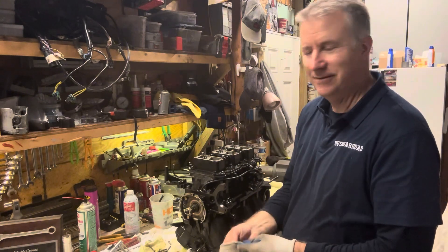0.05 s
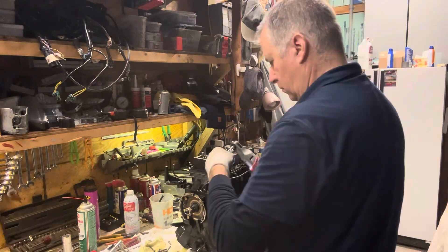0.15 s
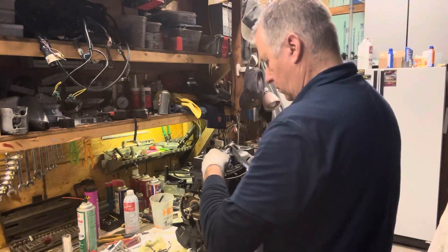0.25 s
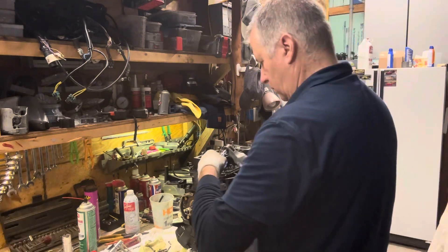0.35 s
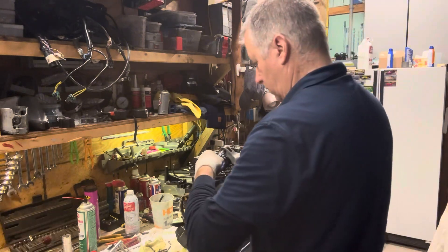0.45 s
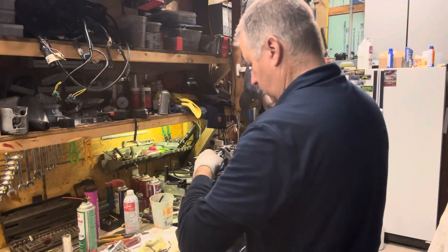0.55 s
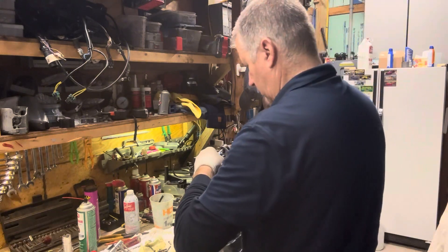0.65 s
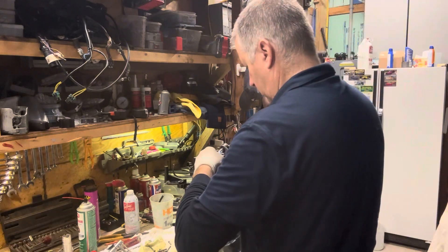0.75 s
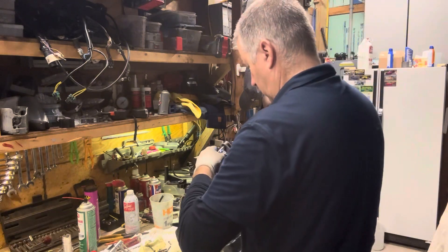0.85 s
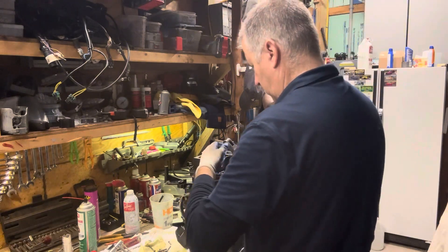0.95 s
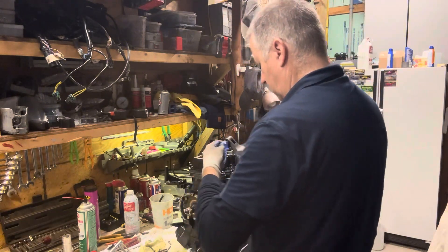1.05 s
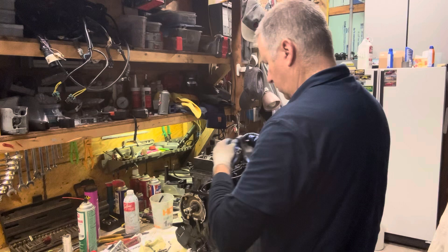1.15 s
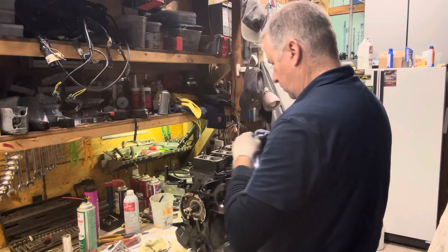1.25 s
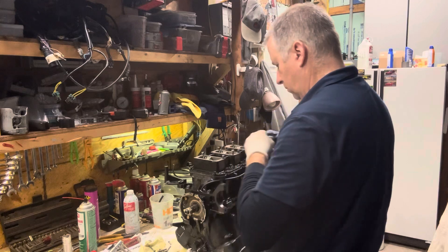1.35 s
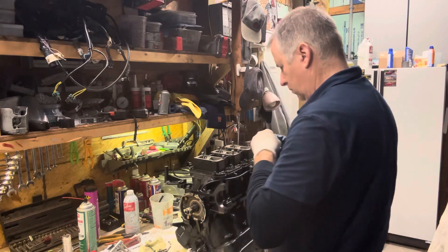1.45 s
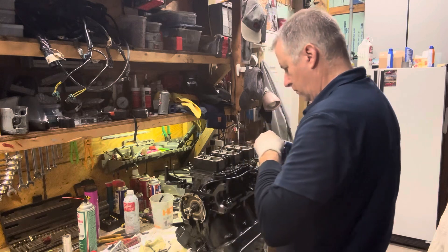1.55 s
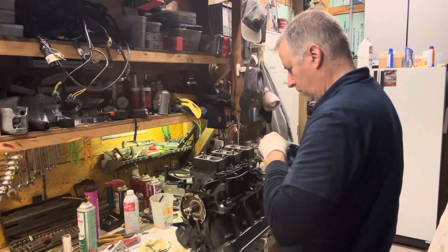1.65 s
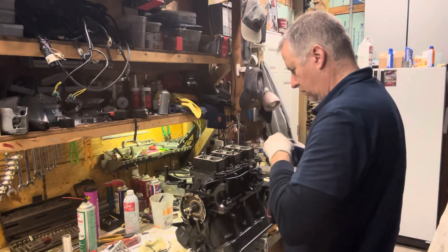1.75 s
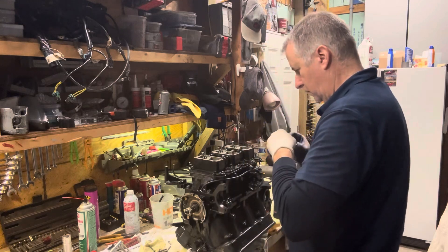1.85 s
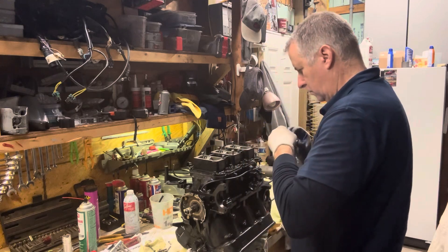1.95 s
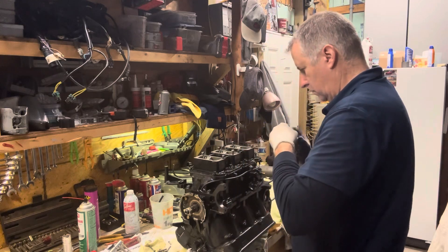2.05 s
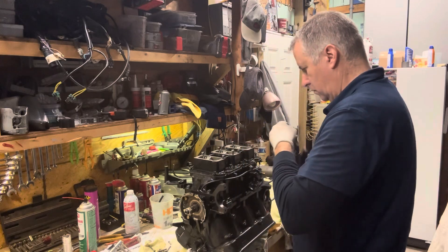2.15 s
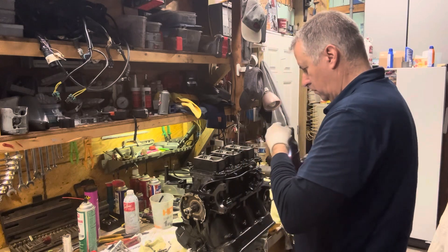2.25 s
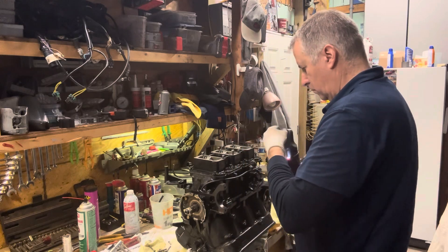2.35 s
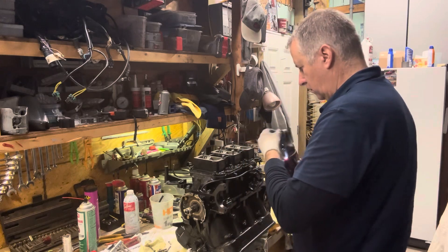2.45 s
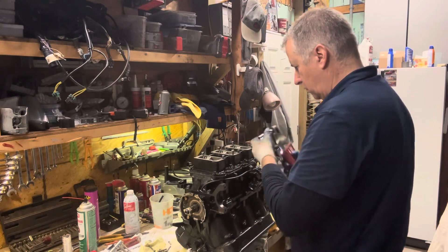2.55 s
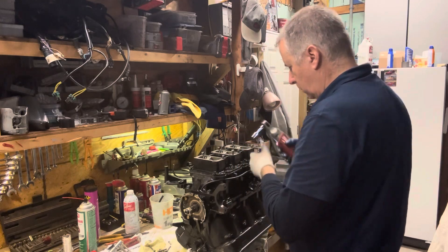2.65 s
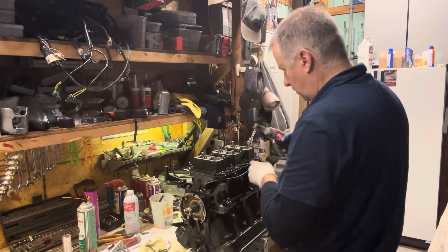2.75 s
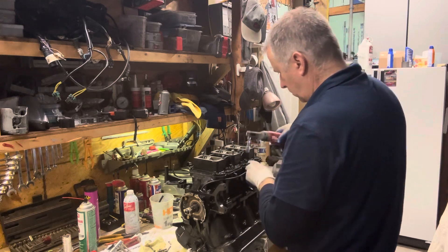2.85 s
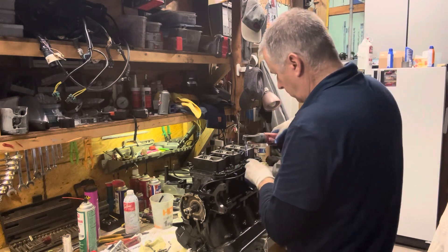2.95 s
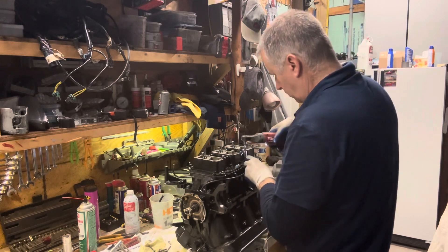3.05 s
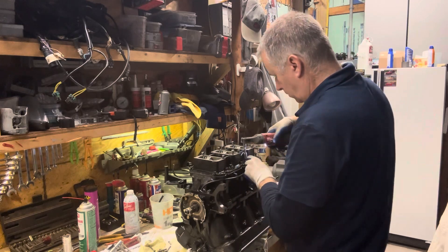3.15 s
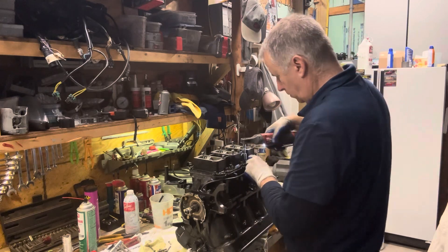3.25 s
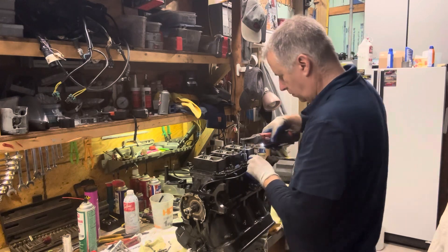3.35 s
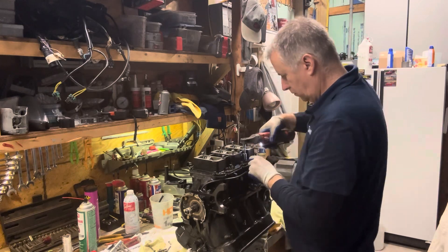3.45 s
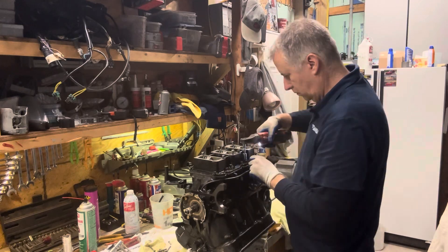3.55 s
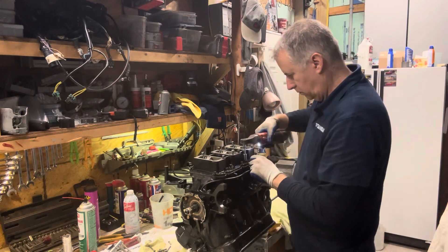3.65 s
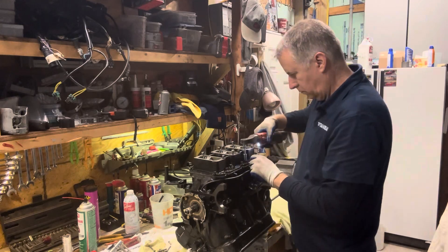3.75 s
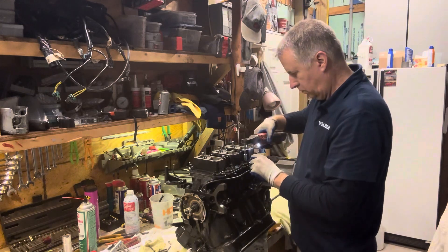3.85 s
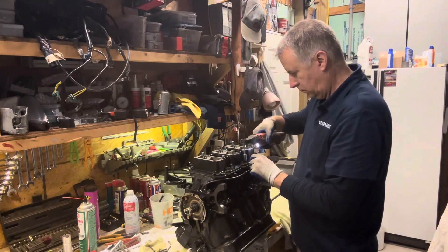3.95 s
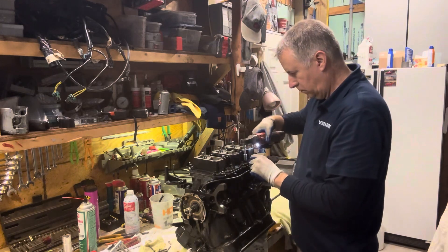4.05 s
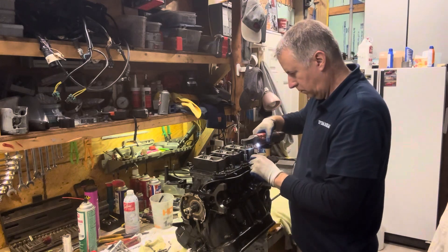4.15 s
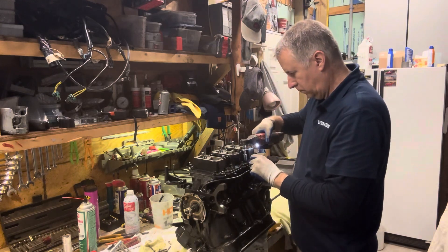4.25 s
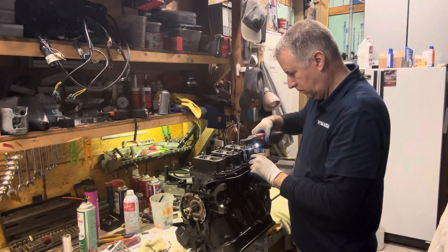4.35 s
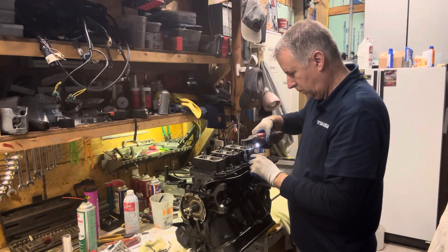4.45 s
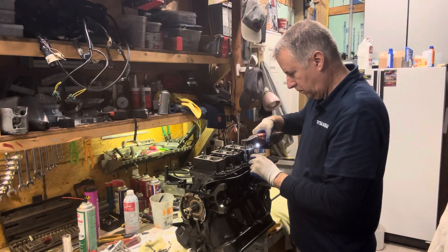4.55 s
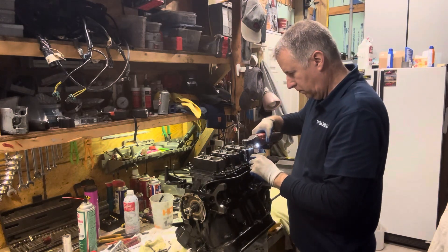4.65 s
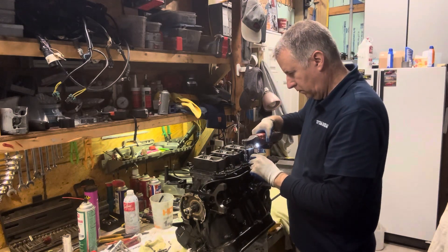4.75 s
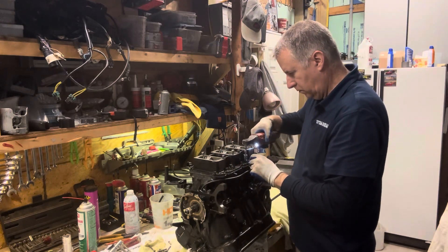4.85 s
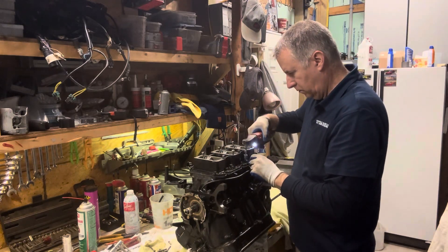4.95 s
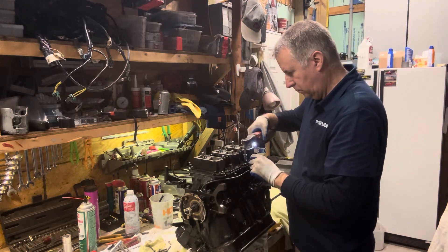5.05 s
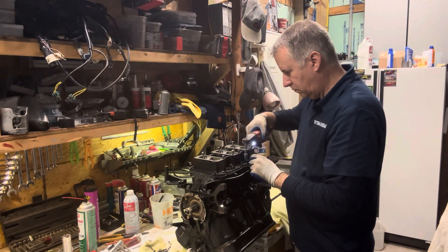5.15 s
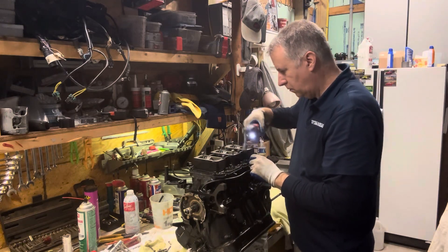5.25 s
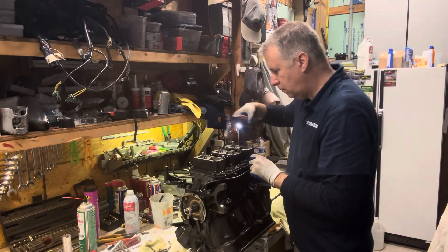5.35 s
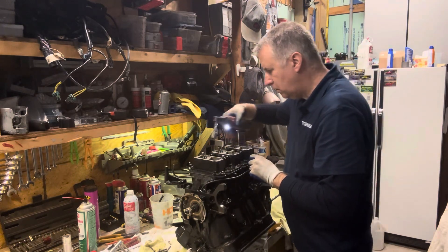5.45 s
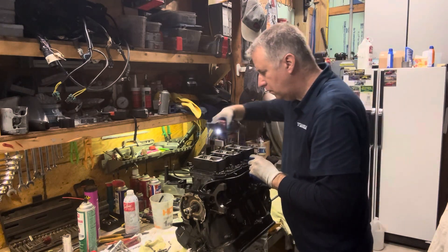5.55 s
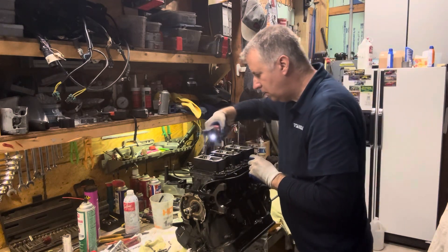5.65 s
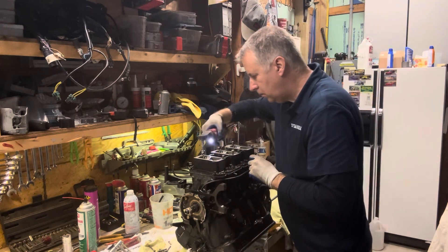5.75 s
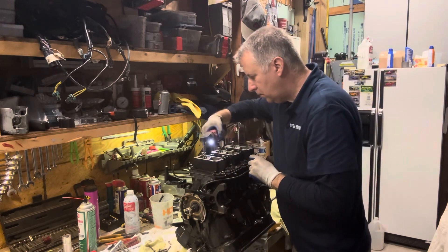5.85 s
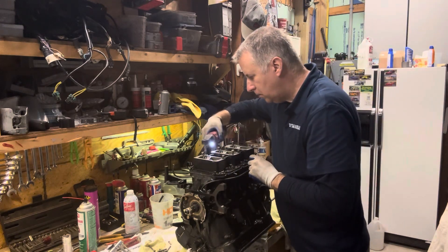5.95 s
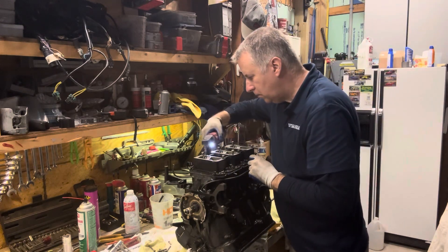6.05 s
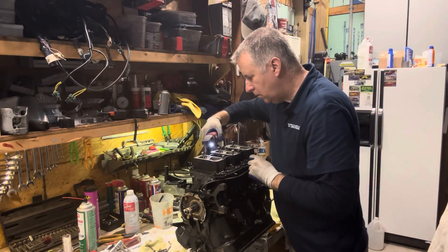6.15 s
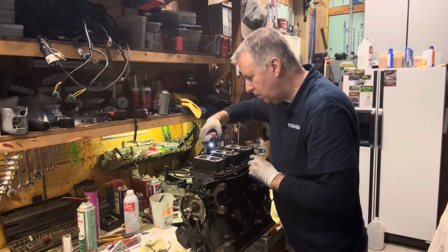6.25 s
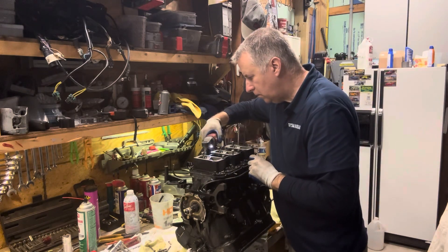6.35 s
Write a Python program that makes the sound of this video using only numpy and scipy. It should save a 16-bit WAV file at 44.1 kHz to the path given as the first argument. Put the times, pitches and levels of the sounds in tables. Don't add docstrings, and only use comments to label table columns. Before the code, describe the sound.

Heard from a few steps away on a small stereo device, a handheld driver runs in uneven bursts: short, long and clattering, a tiny extra turn, then one cut off while running. Its gears hiss brightly, its loose socket chatters and a thin whistle sounds at each trigger pull. Between them come scuffs, metal taps, one crisp click and faint squeaks, with a short dry room echo and low rumble.

```python
import sys
import numpy as np
from scipy import signal
from scipy.fft import rfft, irfft, next_fast_len
from scipy.io import wavfile
from scipy.ndimage import map_coordinates

SR = 44100
rng = np.random.default_rng(int(sys.argv[2]) if len(sys.argv) > 2 else 0)


def gain_from_db(level_db):
    decades = np.asarray(level_db, float) / 20
    return 10 ** decades


def master_out(mix):
    frames = np.transpose(np.atleast_2d(mix))
    ceiling = np.clip(frames, -1, 1)
    pcm = np.round(ceiling * 32767).astype(np.int16)
    wavfile.write(sys.argv[1], SR, pcm)


N = 281799

# time_s, level_db
GEAR_LOAD = [
    [(.13, -66), (.152, -56), (.162, -40), (.18, -33), (.208, -28), (.334, -28), (.402, -34), (.52, -87)],
    [(3.47, -73), (3.49, -40), (3.504, -40), (3.524, -29.5), (3.792, -25.5), (4.162, -30), (4.604, -35.5),
     (4.636, -63), (4.72, -75)],
    [(4.75, -79), (4.774, -43.5), (4.818, -34), (4.874, -31.5), (4.928, -44.5), (5.02, -85)],
    [(6.09, -110), (6.112, -49.5), (6.144, -41), (6.174, -33), (6.39, -32)],
]
# time_s, speed_turns_per_s
SPINDLE_SPEED = [
    [(.135, 1), (.165, 38.7), (.2, 52.8), (.28, 64.4), (.42, 40.9), (.46, 30)],
    [(3.478, 1), (3.51, 42.2), (3.6, 65.5), (3.8, 70.3), (3.92, 70.3), (4.07, 54.4), (4.32, 51.5),
     (4.6, 32.2), (4.66, 15)],
    [(4.757, 1), (4.8, 28.1), (4.9, 42.3), (4.96, 20)],
    [(6.104, 1), (6.16, 22.3), (6.2, 31.3), (6.3, 30.3), (6.39, 43.4)],
]
# pulled_s, released_s, first_slap_s
TRIGGER_TIMES = [(.139, .43, .1865), (3.482, 4.62, 3.52), (4.762, 4.92, 4.8108), (6.108, 6.39, 6.168)]
# housing_db (over the gears), chatter_db
GRIP_BALANCE = [(-11.5, -8), (-12.5, 5.5), (-13, 4.5), (-14.5, 0)]
# at_pull_db, held_db
WHISTLE_LEVELS = [(-46, -68), (-48, -67), (-51, -50), (-51, -43)]
# frequency_hz, density_db
GEAR_SPECTRUM = [(100, -37.5), (300, -19.5), (700, -25.5), (2000, -7.5), (5500, 1), (7500, 0), (9500, -2),
                 (12000, -2), (13500, -1), (15500, -7), (17000, -7)]
# centre_hz, width_hz, level_db
GEARBOX_MODES = [(1980, 990, -11.5), (3430, 32, -13.5), (3810, 510, -13), (5270, 850, -24), (8420, 59, 3.5),
                 (12400, 900, 6)]
# centre_hz, width_hz, level_db
HOUSING_MODES = [(420, 52, -1), (776, 41, 3.5), (1125, 50, -3), (1454, 53, 4.5)]
# centre_hz, width_hz, level_db
SOCKET_MODES = [(11400, 2200, -4.5), (13900, 650, 8), (14200, 710, -10.5), (5940, 3300, -19.5)]
# centre_hz, width_hz, level_db
STAND_MODES = [(105, 16, 0), (141, 8, -5)]
TURN_SLAP_DB = [9, 10.5, 19, 19]
# time_s, peak_db
HARD_SLAP_EVENTS = [(.1865, -16), (3.5609, -14), (3.6398, -10), (3.6975, -10), (3.725, -12), (3.8711, -12),
                    (3.9275, -11), (4.0213, -13), (4.2057, -12), (4.3001, -13), (4.4675, -19),
                    (4.9207, -25)]
# time_s, peak_db
SOCKET_CLICK = (1.8752, -19.5)
# time_s, peak_db, ring_hz, crack_db, t60_s
TAP_EVENTS = [(0.097, -54.5, 1680, -10.5, 0.049), (0.488, -34.5, 1336, -30.5, 0.023),
              (0.7, -45, 1175, -20, 0.035), (0.762, -50, 1503, -26, 0.028), (0.775, -41, 3310, -34, 0.025),
              (0.88, -47.5, 820, -24, 0.023), (1.12, -62, 1134, -7, 0.067),
              (1.874, -36.5, 6914, -0.5, 0.029), (2.183, -43.5, 2242, -25, 0.056),
              (2.263, -52, 1560, -18, 0.095), (3.143, -59, 723, -12, 0.053), (3.161, -49, 3290, -16, 0.052),
              (3.42, -61, 1210, -14.5, 0.028), (5.116, -57.5, 754, 6, 0.039),
              (5.311, -48, 1980, -15.5, 0.04), (5.938, -36, 4500, -28, 0.03),
              (5.953, -49, 3900, -23, 0.014), (6.043, -68, 1140, -4.5, 0.035),
              (6.068, -67, 1830, -15, 0.031)]
# time_s, peak_db, pitch_hz, t60_s
THUD_EVENTS = [(.097, -62, 240, .03), (0.489, -54, 240, .03), (0.88, -53.5, 240, 0.032),
               (3.161, -61, 240, .03), (4.87, -50.5, 95, .3), (5.314, -37, 230, .03), (.93, -62, 280, .1)]
# time_s, peak_db, ring_hz, t60_s
TICK_EVENTS = [
    (0.138, -32, 4286, 0.11),
    (2.31, -69, 2224, 0.5),
    (2.425, -49, 2260, 0.11),
    (2.972, -59.5, 4440, 0.063),
    (3.058, -59, 3620, 0.021),
    (3.282, -59, 2450, 0.034),
    (5.535, -75, 5200, .15),
    (5.569, -87, 5270, 0.055),
]
# peak_s, rise_s, fall_s, bright_db, dull_db (over bright)
RUB_EVENTS = [(0, .01, 0.21, -65.5, -5.5), (.12, 0.12, .03, -69, -9), (.575, 0.09, 0.04, -72, 5.5),
              (0.699, 0.013, 0.077, -65.5, -0.5), (0.775, .02, 0.098, -67.5, -1.5),
              (.9, 0.07, 0.29, -64.5, -3), (1.17, 0.1, 0.049, -71.5, -32), (1.878, .006, .13, -56, -13),
              (2.059, 0.084, 0.073, -74, -7), (2.188, 0.02, 0.093, -64.5, 1.5),
              (2.266, 0.13, 0.072, -67.5, 2), (2.35, .08, 0.033, -83, -26), (2.469, 0.075, 0.064, -51.5, 1),
              (2.76, .12, 0.13, -70, -1), (3.163, 0.03, 0.087, -62, -5.5), (3.286, 0.057, 0.11, -77, -12),
              (3.47, 0.13, .04, -63, -1), (5.121, 0.019, 0.079, -64, -1), (5.3, 0.15, 0.088, -65, 3),
              (5.944, 0.0082, 0.028, -64, -15), (5.97, 0.033, 0.11, -78.5, 3)]
# frequency_hz, density_db
GRIT_SPECTRUM = [(900, -37), (1500, -16.5), (2400, -3), (4500, 0), (8000, -5), (12500, -12), (14500, -12),
                 (17000, -19)]
# frequency_hz, density_db
SOLE_SPECTRUM = [(150, -54.5), (250, -22), (452, -13), (644, -5.5), (793, -8.5), (986, -7.5), (3000, -13),
                 (3900, -46), (6600, -120)]
# frequency_hz, t60_s
GARAGE_DECAY = [(200, 0.27), (1000, 0.21), (5000, 0.21), (14000, 0.18)]
# time_s, level_db
STEP_EVENTS = [(.1, -64), (.3, -58.5), (.56, -61.5), (.97, -55.5), (1.22, -64.5), (1.38, -64), (1.62, -62),
               (1.78, -62), (2.05, -67.5), (2.82, -61.5), (3.1, -63.5), (3.4, -61.5), (3.7, -56),
               (4.08, -54), (4.36, -52), (4.64, -59), (4.9, -49), (5.16, -58.5), (5.36, -63), (5.58, -64.5),
               (5.84, -68.5), (6.0, -66.5), (6.3, -56.5)]
# frequency_hz, density_db
RUMBLE_SPECTRUM = [(12, -46.5), (20, -23), (55, 2.5), (140, -17.5), (225, -20.5), (261, -25), (362, -21),
                   (400, -39.5), (520, -67), (880, -120)]
# frequency_hz, density_db
AIR_SPECTRUM = [(90, -30), (150, 0), (365, -1), (800, -10), (2000, -15), (6000, -19), (12500, -22),
                (15000, -22), (17000, -30)]

TEETH = 23


def unit(x):
    return x / np.sqrt(np.mean(x ** 2) + 1e-20)


def along(points, hz):
    f, v = np.transpose(points)
    return np.interp(np.log(hz + 1), np.log(f + 1), v)


def curves(rows):
    s, *columns = np.transpose(rows)
    return [np.interp(np.arange(N) / SR, s, column) for column in columns]


def spans(tables):
    rows = []
    for table in tables:
        first, last = table[0], table[-1]
        rows += [(first[0] - .006, -130, *first[2:]), *table, (last[0] + .02, -130, *last[2:])]
    return curves(rows)


def per_burst(values):
    starts = [table[0][0] - .01 for table in GEAR_LOAD]
    burst = np.searchsorted(starts, np.arange(N) / SR) - 1
    return np.asarray(values)[np.maximum(burst, 0)]


def wobble(rate):
    return map_coordinates(rng.standard_normal(int(N * rate / SR) + 4), [np.arange(N) * rate / SR])


def peaked(s, db, rise, fall):
    t = np.arange(N) / SR - s
    reach = np.maximum(np.where(t < 0, rise, fall), .003)
    return gain_from_db(db - 40 * (t / reach) ** 2)


def filtered(x, response):
    m = next_fast_len(N + SR // 2)
    return irfft(rfft(x, m) * response(np.fft.rfftfreq(m, 1 / SR)), m)[..., :N]


def resonant(modes):
    def response(f):
        total = 0
        for k, (centre, width, db) in enumerate(modes):
            total = total + (-1) ** k * gain_from_db(db) * 1j * f * width / (centre ** 2 - f * f + 1j * f * width)
        return total
    return response


def noise(spectrum, grain_db=0., channels=1):
    raw = rng.standard_normal((channels, N)) * gain_from_db(grain_db * wobble(600))
    return unit(filtered(raw, lambda hz: gain_from_db(along(spectrum, hz))))


def driver():
    load_db, = spans(GEAR_LOAD)
    turns, = curves(sum(SPINDLE_SPEED, []))
    angle = 2 * np.pi * np.cumsum(turns * (1 + .006 * wobble(25))) / SR
    pulled, released, _ = per_burst(TRIGGER_TIMES).T
    t = np.arange(N) / SR
    powered = np.clip(np.minimum((t - pulled) / .004, (released + .03 - t) / .03), 0, 1)
    tones = rotation_tones(load_db, turns, angle, pulled) + switching_whistle(angle, pulled)
    return gain_from_db(load_db) * gear_noise(angle) + chatter(load_db, angle) + powered * tones


def gear_noise(angle):
    throb = gain_from_db(2 * np.cos(angle) + .8 * wobble(30))
    teeth = noise(GEAR_SPECTRUM, grain_db=2.0)[0]
    hiss = unit(teeth + 0.71 * filtered(teeth, resonant(GEARBOX_MODES))) * throb
    growl = noise([(100, -14.0), (400, -12.5), (800, 2.5), (1800, -1), (4000, -25)], grain_db=4.0)[0]
    housing_db = per_burst(GRIP_BALANCE).T[0] + wobble(20)
    housing = unit(0.47 * growl + filtered(growl, resonant(HOUSING_MODES))) * throb * gain_from_db(housing_db)
    return hiss + housing


def chatter(load_db, angle):
    chance = .012 * ((1 + np.cos(angle)) / 2) ** 3
    slaps = (rng.random(N) < chance) * rng.standard_normal(N) * gain_from_db(2.5 * wobble(40))
    chatter_db = per_burst(GRIP_BALANCE).T[1]
    return unit(filtered(slaps, resonant(SOCKET_MODES))) * gain_from_db(load_db + chatter_db - 16)


def rotation_tones(load_db, turns, angle, pulled):
    bite_s, full_mesh_turns = 3.88, 45
    mesh_gain = gain_from_db(load_db - 27 + 5 * wobble(30)) * np.minimum(turns / full_mesh_turns, 1) ** 2
    mesh = mesh_gain * np.sin(TEETH * angle)
    bitten = np.clip((np.arange(N) / SR - bite_s) / .03, 0, 1) * (pulled < bite_s)
    whine = gain_from_db(-39.5 + 1.5 * (turns - 70) - 12 * bitten + 2 * wobble(15)) * np.sin(48.3 * angle)
    shake = bitten * np.abs(resonant(STAND_MODES)(2 * turns)) ** 2
    hum = gain_from_db(load_db - 24 + 2 * wobble(10)) * shake * np.sin(2 * angle)
    return mesh + whine + hum


def switching_whistle(angle, pulled):
    carrier_hz, settle_s = 10000, .04
    t = np.arange(N) / SR
    first_db, held_db = per_burst(WHISTLE_LEVELS).T
    level_db = held_db + (first_db - held_db) * np.exp(-np.maximum(t - pulled, 0) / settle_s)
    carrier = np.sin(2 * np.pi * carrier_hz * t)
    return gain_from_db(level_db + 6 + 2 * wobble(60)) * carrier * np.cos(TEETH * angle)


def knocks():
    turned = np.cumsum(curves(sum(SPINDLE_SPEED, []))[0]) / SR
    _, released, first = per_burst(TRIGGER_TIMES).T
    clock = np.arange(N) / SR
    whole = np.diff(np.floor(turned - np.interp(first, clock, turned)), prepend=0) > 0
    at = np.flatnonzero(whole & (clock >= first) & (clock < released))
    scatter_db = 3 * rng.exponential(size=len(at))
    slap_db = (spans(GEAR_LOAD)[0] + per_burst(TURN_SLAP_DB))[at] - scatter_db
    out, t = np.zeros(N + 400), np.arange(400) / SR
    rebound = .8 * (t > .005) * gain_from_db(-60 * np.abs(t - .005) / .004)
    fade = gain_from_db(-60 * t / .004) + rebound
    for s, db in [SOCKET_CLICK, *HARD_SLAP_EVENTS, *zip(clock[at], slap_db)]:
        out[round(s * SR):][:len(t)] += gain_from_db(db - 6) * unit(fade * rng.standard_normal(len(t)))
    return filtered(out[:N], resonant(SOCKET_MODES))


def taps():
    out, t = np.zeros(N + SR), np.arange(SR // 5) / SR
    for s, db, ring_hz, crack_db, t60 in TAP_EVENTS:
        draw = rng.standard_normal((2, len(t)))
        fade = gain_from_db(-60 * t / max(t60, .004))
        ring = np.sin(2 * np.pi * ring_hz * t + .007 * np.sqrt(ring_hz) * np.cumsum(draw[0]))
        crack = gain_from_db(crack_db + 0.5) * np.gradient(draw[1]) * (gain_from_db(-60 * t / 0.033) + 0.9 * fade)
        out[round(s * SR):][:len(t)] += gain_from_db(db) * (ring * fade * (1 - np.exp(-t / 0.00081)) + crack)
    for s, db, hz, t60 in THUD_EVENTS:
        fade = gain_from_db(db - 60 * t / t60) * (1 - np.exp(-t / 0.0022))
        out[round(s * SR):][:len(t)] += fade * np.sin(2 * np.pi * hz * t)
    for s, db, ring_hz, t60 in TICK_EVENTS:
        ring = np.sin(2 * np.pi * ring_hz * t + .17 * np.cumsum(rng.standard_normal(len(t))))
        out[round(s * SR):][:len(t)] += gain_from_db(db - 60 * t / t60) * (1 - np.exp(-t / 0.0016)) * ring
    return out[:N]


def scuffs():
    strokes = np.array([peaked(s, db, rise, fall) for s, rise, fall, db, _ in RUB_EVENTS])
    dull = gain_from_db(np.transpose(RUB_EVENTS)[4]) @ strokes
    grit = strokes.sum(0) * noise(GRIT_SPECTRUM, grain_db=2.5)[0]
    body = dull * noise(SOLE_SPECTRUM, grain_db=2.5)[0]
    return gain_from_db(1.5 * wobble(40)) * (grit + body)


def garage(x, count=4):
    slot = np.arange(N) / SR / .1 % count
    wet = np.zeros((2, N))
    for k in range(count):
        away = np.abs((slot - k + count / 2) % count - count / 2)
        share = np.cos(np.pi / 2 * np.minimum(away, 1))
        hz, t, z = signal.stft(rng.standard_normal((2, SR // 3)), SR, nperseg=256)
        decay = gain_from_db(-60 * t / along(GARAGE_DECAY, hz)[:, None])
        tail = signal.istft(z * decay, SR, nperseg=256)[1]
        delayed = np.pad(x * share, (130, 0))[None]
        wet += signal.oaconvolve(delayed, tail / np.linalg.norm(tail[0]), axes=1)[:, :N]
    return wet


def floor():
    shared, own = noise(RUMBLE_SPECTRUM, channels=2)
    swell = gain_from_db(-69) + sum(peaked(s, db, 0.23, 0.23) for s, db in STEP_EVENTS)
    ports = np.array([0.81 * shared + 0.18 * own, 0.63 * shared - 0.16 * own])
    rumble = swell * gain_from_db(1.7 * wobble(14)) * ports
    return rumble + gain_from_db(-77.5 + wobble(6)) * noise(AIR_SPECTRUM, channels=2)


def scene():
    near, slaps = driver() + taps() + scuffs(), knocks()
    lag_s = 4 / SR
    sides = np.array([[1], [-1]])
    direct = filtered(near + slaps, lambda hz: np.exp(-1j * np.pi * hz * lag_s * sides))
    return gain_from_db(0.5) * direct + gain_from_db(0.5) * garage(near + gain_from_db(-7.5) * slaps) + floor()


def low_pass(x):
    return signal.sosfilt(signal.butter(12, 16540, fs=SR, output="sos"), x)


def record(dry):
    hz, t, z = signal.stft(np.array([dry[0] + dry[1], dry[0] - dry[1]]) / 2, SR, nperseg=1024)
    hz = hz[:, None]

    def blocks(draw):
        return np.repeat(draw(len(t)), 2)[:len(t)]

    def edge(middle_hz, wander_hz):
        return middle_hz + wander_hz * np.round(blocks(rng.standard_normal))

    level = np.abs(z[0, 100:]).max(axis=0)
    loud = level > gain_from_db(-62)
    attack = level > gain_from_db(17) * np.roll(level, 1)
    blip = loud & (blocks(rng.random) < .13) & (hz > 15300) & (hz < 15900)
    z[0] *= (hz < edge(12500, 300) + 600 * loud) | blip | attack
    below_gap = hz < edge(7750, 40)
    above_gap = (hz > edge(11650, 60)) & (hz < np.minimum(edge(15500, 400), 15900))
    z[1] *= below_gap | above_gap | attack
    mid, side = signal.istft(z, SR, nperseg=1024)[1][:, :N]
    return low_pass(np.array([mid + side, mid - side]))


dry = scene()
out = record(dry)
master_out(out)
```